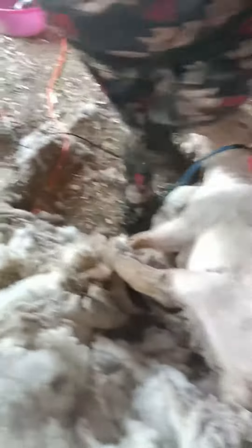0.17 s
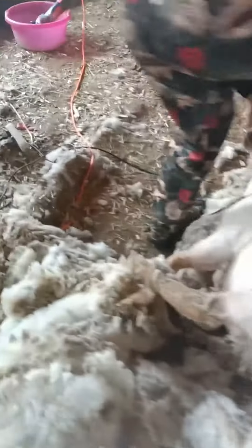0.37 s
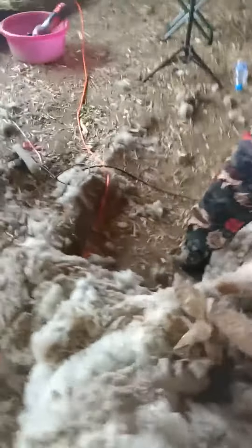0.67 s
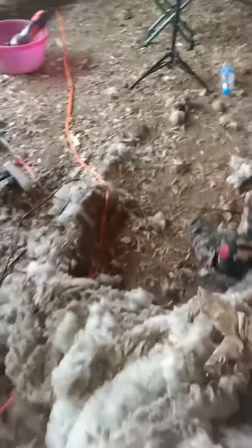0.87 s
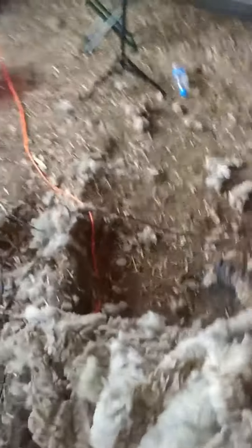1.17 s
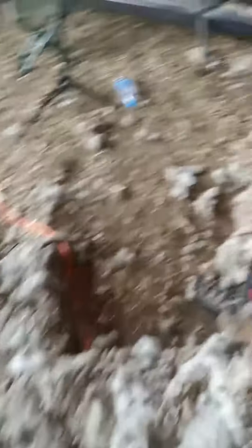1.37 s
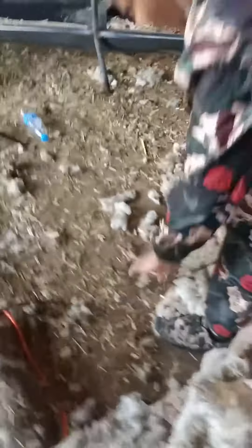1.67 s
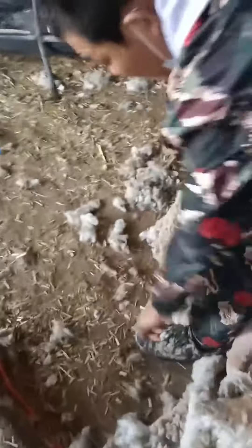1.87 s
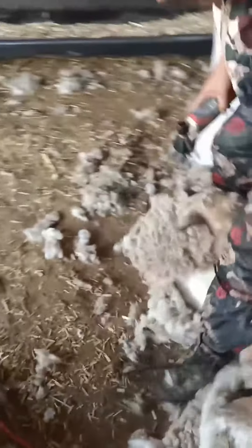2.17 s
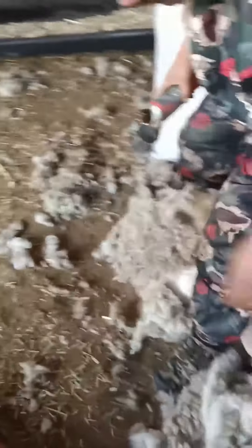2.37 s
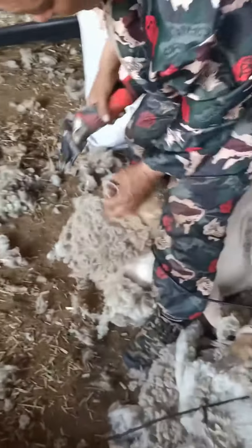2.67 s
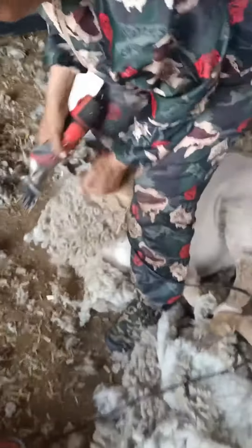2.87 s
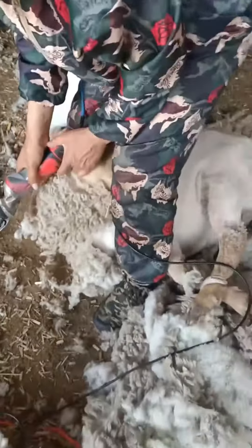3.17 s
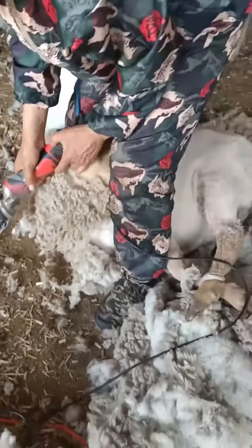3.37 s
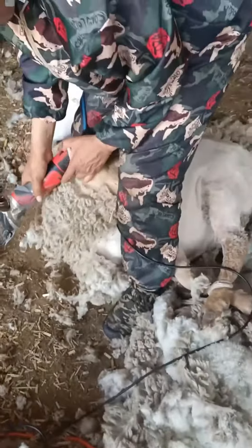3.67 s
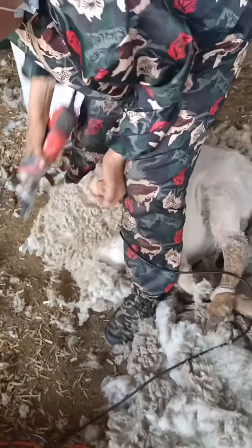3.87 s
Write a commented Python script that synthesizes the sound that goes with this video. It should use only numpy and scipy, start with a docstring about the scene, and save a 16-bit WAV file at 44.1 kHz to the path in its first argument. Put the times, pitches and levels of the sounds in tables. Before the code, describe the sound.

Electric clipper motor coasts down within half a second; about three seconds of faint rustling, small ticks, muffled bumps and low air rumble follow, then the motor whines up, bright and close, on a barn floor, hand-held microphone.

```python
"""A whine and rattle sag to a stop, a rustling lull follows, then the motor whines up again close by.
It is an electric shearing handpiece in an open barn: wavering rotor orders over gear rattle, coloured by its housing
and followed by noise tails for the barn. Fleece and straw rustle as patchy hiss, feet, body and cable bump as dull
rings, straw and metal tick, and low noise stands for air over the two ports of a hand-held microphone."""
import sys
import numpy as np
from scipy import signal
from scipy.fft import rfft, irfft
from scipy.io import wavfile

SR = 44100
rng = np.random.default_rng(int(sys.argv[2]) if len(sys.argv) > 2 else 0)


def store_wav(level_fs):
    """Save 16-bit WAV to argv[1]."""
    pcm = np.round(np.clip(np.atleast_2d(level_fs), -1, 1) * 32767)
    wavfile.write(sys.argv[1], SR, pcm.T.astype(np.int16))


def makeup_ratio(level_db):
    """Linear amplitude ratio for a level in decibels (20 dB per factor of ten)."""
    decades = np.asarray(level_db, float) / 20
    return 10 ** decades


N = 176400
HZ = np.fft.rfftfreq(N + SR, 1 / SR) + 1e-3  # filter bins, with a second of room for tails

# air over the ports, before lumps and brightening: (time [s], level [dB])
WIND = [(0, -38.5), (.43, -48.5), (.6, -45), (.95, -56), (1., -39), (1.3, -42), (1.55, -47), (1.84, -56.5),
        (1.88, -42.5), (2.25, -43.5), (2.72, -59), (3.05, -48), (3.2, -68), (3.31, -59.5), (4, -61)]
# spectrum of that air: (frequency [Hz], relative density [dB])
WIND_COLOUR = [(15, 12), (45, 5.5), (80, 2), (234, -16), (450, -56)]
# single buffets of air on the ports: (time [s], starting level [dB])
BUFFETS = [(.462, -29.5), (1.13, -32.5), (1.258, -34), (1.345, -40), (1.415, -39), (1.863, -41.5),
           (2.211, -37)]
# fleece and straw, before patches and pan: (time [s], level [dB])
RUSTLE = [(.48, -51.5), (.6, -54.5), (.93, -53), (1., -49), (1.16, -57.5), (1.45, -49.5), (1.56, -52),
          (1.7, -50), (1.84, -56), (2.02, -50), (2.08, -54.5), (2.21, -50.5), (2.4, -56.5), (2.66, -51.5),
          (2.72, -59.5), (3.05, -55.5), (3.45, -60), (3.58, -64)]
# spectrum of fleece and straw: (frequency [Hz], relative density [dB])
RUSTLE_COLOUR = [(200, -4), (607, -8.5), (1150, -12), (2500, -8), (4200, -7.5), (5000, -13.5), (7090, -22),
                 (10000, -27), (15500, -23.5)]
# how alike the two ports hear the rustle: (frequency [Hz], left-right correlation [-1 to 1])
RUSTLE_LIKENESS = [(290, 0.91), (900, 0), (15000, 0.09)]
# soft bumps of feet, body and cable, before pan: (time [s], starting level [dB], pitch [Hz])
BUMPS = [(0.279, -33.5, 175), (0.505, -45.5, 220), (0.545, -42, 402), (0.875, -40.5, 240),
         (0.931, -46.5, 288), (1.37, -48.5, 353), (1.457, -40.5, 270), (1.517, -47, 400), (1.747, -40, 277),
         (1.922, -42.5, 266), (2.002, -43.5, 191), (3.009, -45, 200), (3.062, -52.5, 524),
         (3.302, -42.5, 162), (3.362, -52, 584), (3.531, -49, 215)]
# dry ticks of straw and metal: (time [s], starting level [dB], pitch [Hz], treble of the spit over its low part [dB])
TICKS = [(0.394, -40, 5500, 7), (1.01, -41.5, 2780, -22), (1.073, -40, 4080, -9), (1.424, -43, 3420, 0),
         (1.504, -47.5, 3500, 10.5), (2.1919, -34.5, 3040, -78), (2.204, -38.5, 3000, -41)]
# thin sizzles as the blades drag to rest: (time [s], length [s], level [dB], centre [Hz], width [Hz])
SIZZLES = [(0.357, 0.0065, -41, 12700, 2500), (0.379, 0.034, -45.5, 13100, 3970),
           (0.415, 0.063, -51, 10970, 1490)]
# motor loudness, before pan and barn: (time [s], level [dB], treble gain [dB])
COAST_LEVEL = [(0, -28, 0), (.1, -31.5, -2), (.18, -34.5, 0.5), (.27, -36, 0.5), (.33, -43.5, 5),
               (.42, -52, 8), (.5, -69, 10)]
SPIN_LEVEL = [(3.584, -65, -14), (3.593, -35.5, 1.5), (3.62, -27, 2), (3.68, -26.5, 3.5), (3.741, -20, 1),
              (3.85, -19.5, 2), (3.95, -20.5, 6.5), (4, -20.5, 3.5)]
# whining multiples of the rotor speed: (order [per turn])
COAST_ORDERS = [3, 6, 9, 12, 15]
SPIN_ORDERS = [1, 5, 6, 7, 12, 13, 15]
# whine of each order at speed, before waver and colour: (amplitude over rattle rms [dB])
COAST_ORDER_DB = [-9, -5, -6, -9, -12]
SPIN_ORDER_DB = [-11, -13, -8, -11, -9, -12, -9]
# housing as heard from each side: (frequency [Hz], relative gain [dB])
COAST_COLOUR = [(250, -22), (913, -25.5), (1560, -12.5), (1850, -13), (2300, 2), (2730, -4.5), (4320, 0.5),
                (5200, -9), (6520, -22), (8200, -32), (11500, -24.5), (13900, -16.5), (15500, -6)]
SPIN_COLOUR = [(130, -27.5), (280, -20), (560, -10.5), (1190, -10), (1600, -2.5), (2400, -4.5), (3500, 5),
               (4100, 4.5), (5400, -2), (6470, -15.5), (8300, -20), (9100, -42), (9700, -20.5),
               (14500, -13.5)]
# direct sound at the two ports: (frequency [Hz], left leads right by [rad])
COAST_PHASE = [(100, -1), (2500, 1.67), (9000, 6)]
SPIN_PHASE = [(950, .8), (1500, 1.7), (1950, 5.2), (2500, 6.7), (3600, 7.8), (4500, 9.2), (7240, 13.3),
              (10500, 34)]

TREBLE_HZ, BASS_HZ = 7860, 1290  # corners of tilt()
WIND_LUMPY_DB, WIND_LUMP_HZ = 3.5, 14
WIND_GUST_BRIGHTENS = 0.62  # dB above 70 Hz per dB of gust
BUFFET_HZ, BUFFET_T60_S = 55.3, .16
RUSTLE_GRAINS_PER_S, RUSTLE_GRAIN_SHARE = 320, 0.23
RUSTLE_PATCHY_DB, RUSTLE_PAN_DB = 1.5, -1  # pan: left gain, right gets the opposite
RUSTLE_TREBLE_FOLLOWS, RUSTLE_BASS_FOLLOWS = 0.077, -0.36  # dB per dB of swell
BUMP_T60_S, BUMP_PAN_DB = 0.059, -1.5  # pan: left gain, right gets the opposite
BUMP_PUFF_DB, BUMP_PUFF_HZ = -9, 770
TICK_T60_S, TICK_SPIT_T60_S, TICK_SPIT_DB = .009, .035, -10.5
COAST_START_HZ, COAST_SAG_HZ_PER_S = 205, 405
FULL_HZ, SHORT_OF_FULL_HZ, SPIN_FROM_S, SPIN_LAG_S = 430, 298, 3.6, .179
RATTLE_PER_TURN, RATTLE_SPREAD_DB, RATTLE_SHARE = 4.6, 2, 0.43
TURNS_PER_STROKE, STROKE_DB, TURN_DB, KNOCK_DB = 11.5, -1, 0.5, 4.5
WHINE_WAVER_DB, WHINE_WAVER_HZ, TURN_JITTER_RAD = 4.5, 30, .035
COAST_PAN_DB, SPIN_PAN_DB = -1.5, -.3  # left minus right
COAST_WET_DB, SPIN_WET_DB, BARN_T60_S = -6, -5, .3
TOP_HZ = 14600  # upper limit of the motor


def rms_one(x):
    """Scale to rms 1."""
    return x / np.sqrt(np.mean(x ** 2) + 1e-20)


def in_time(rows):
    """Table columns joined by straight lines in time."""
    s, *columns = np.transpose(rows)
    return [np.interp(np.arange(N) / SR, s, c) for c in columns]


def at_hz(points, hz=HZ):
    """Table value on a log-frequency axis."""
    f, v = np.transpose(points)
    return np.interp(np.log(hz), np.log(np.maximum(f, 1e-3)), v)


def shape(x, response):
    """Filter by a frequency response."""
    return irfft(rfft(x, N + SR) * response, N + SR)[..., :N]


def high_pass(hz, order=4):
    """Smooth response that passes what lies above hz."""
    return 1 / (1 + (hz / HZ) ** order)


def low_pass(hz, order=4):
    """Smooth response that passes what lies below hz."""
    return 1 / (1 + (HZ / hz) ** order)


def drift(rate_hz):
    """Slow random wander of spread 1, drawn at a twentieth of the sample rate."""
    r = np.exp(-40 * np.pi * rate_hz / SR)
    slow = signal.lfilter([1], [1, -2 * r, r * r], rng.standard_normal(N // 20 + 3002))
    slow = slow[3000:]  # settled part
    return np.interp(np.arange(N) / 20, np.arange(len(slow)), rms_one(slow))


def grains(per_s, spread_db):
    """Random clicks of uneven size and either sign."""
    sizes = makeup_ratio(spread_db * np.minimum(rng.exponential(1, N), 5)) * rng.choice([-1, 1], N)
    return sizes * (rng.random(N) < per_s / SR)


def tilt(x, treble_db, bass_db):
    """Separate gains for the top and the bottom."""
    top = shape(x, high_pass(TREBLE_HZ, 20))
    low = shape(x, low_pass(BASS_HZ, 10))
    return x + top * (makeup_ratio(treble_db) - 1) + low * (makeup_ratio(bass_db) - 1)


def ring(s, db, hz, t60):
    """One damped sine starting at s."""
    t = np.arange(N) / SR - s
    return (t > 0) * makeup_ratio(db - 60 * np.maximum(t, 0) / t60) * np.sin(2 * np.pi * hz * t)


def wind():
    """Air over the ports: low noise, its own in each, lumpy and brighter in gusts, plus thumping buffets."""
    level_db, = in_time(WIND)
    lumps_db = [WIND_LUMPY_DB * (drift(WIND_LUMP_HZ) - .5) for _ in range(2)]
    gust_db = level_db + np.array(lumps_db)
    air = rms_one(shape(rng.standard_normal((2, N)), makeup_ratio(at_hz(WIND_COLOUR))))
    upper = shape(air, high_pass(70))
    brighten = makeup_ratio(WIND_GUST_BRIGHTENS * (gust_db - gust_db.mean())) - 1
    buffets = sum(ring(s, db, BUFFET_HZ, BUFFET_T60_S) for s, db in BUFFETS)
    return makeup_ratio(gust_db) * (air + upper * brighten) - buffets


def rustle():
    """Fleece and straw: patchy fine hiss with small crackles, partly shared by the two ports."""
    level_db, = in_time(RUSTLE)
    swell_db = level_db - level_db.mean()
    crackle = rms_one(grains(RUSTLE_GRAINS_PER_S, spread_db=9.0))
    mid = (1 - RUSTLE_GRAIN_SHARE) * rng.standard_normal(N) + RUSTLE_GRAIN_SHARE * crackle
    alike = np.clip(at_hz(RUSTLE_LIKENESS), -.99, .99)
    gain = makeup_ratio(at_hz(RUSTLE_COLOUR))
    mid = shape(rms_one(mid), gain * np.sqrt(1 + alike))
    side = shape(rng.standard_normal(N), gain * np.sqrt(1 - alike))
    pair = rms_one(np.array([mid + side, mid - side]))
    bass_db = RUSTLE_PATCHY_DB * drift(2.1) + RUSTLE_BASS_FOLLOWS * swell_db
    pair = tilt(pair, RUSTLE_TREBLE_FOLLOWS * swell_db, bass_db)
    pan_db = np.array([[RUSTLE_PAN_DB], [-RUSTLE_PAN_DB]])
    return pair * makeup_ratio(level_db + RUSTLE_PATCHY_DB * drift(10.7) + pan_db)


def bumps():
    """Feet, body and cable: a dull ring and a puff of low noise for each bump."""
    t = np.arange(N) / SR
    puff = rms_one(shape(rng.standard_normal(N), low_pass(BUMP_PUFF_HZ) * high_pass(200)))
    x = np.zeros(N)
    for s, db, hz in BUMPS:
        # the puff dies away at half the ring's rate
        decay = makeup_ratio(db + BUMP_PUFF_DB - 30 * np.abs(t - s) / BUMP_T60_S)
        x += ring(s, db, hz, BUMP_T60_S) + puff * (t > s) * decay
    return x * makeup_ratio([[BUMP_PAN_DB], [-BUMP_PAN_DB]])


def ticks():
    """Straw and metal: a very short ring and a spit of noise with its own treble."""
    t = np.arange(N) / SR
    white = rng.standard_normal((2, N))
    low = rms_one(shape(white[0] + .5 * white, makeup_ratio(at_hz(RUSTLE_COLOUR)) * high_pass(1500)))
    top = rms_one(shape(white, high_pass(TREBLE_HZ, 10)))
    x = np.zeros((2, N))
    for s, db, hz, top_db in TICKS:
        decay = makeup_ratio(db + TICK_SPIT_DB - 60 * np.abs(t - s) / TICK_SPIT_T60_S)
        spit = (low + top * makeup_ratio(top_db)) * (t > s - .001) * decay  # starts 1 ms early
        x += ring(s, db, hz, TICK_T60_S) + spit
    return x


def sizzles():
    """Blades dragging to rest: brief narrow bands of hiss that fade over their second half."""
    t = np.arange(N) / SR
    white = rng.standard_normal((2, N))
    x = np.zeros((2, N))
    for s, length, db, hz, width in SIZZLES:
        fade = np.clip(np.minimum((t - s) / .002, (s + length - t) / length * 2), 0, 1)
        x += makeup_ratio(db) * fade * rms_one(shape(white, 1 / (1 + (2 * (HZ - hz) / width) ** 4)))
    return x


def gear_rattle(turns_hz, angle, stroke):
    """Clicks paced by the rotor plus noise, beating with each turn; the bass knocks with each blade stroke."""
    clicks = rms_one(grains(RATTLE_PER_TURN * turns_hz, RATTLE_SPREAD_DB))
    noise = rng.standard_normal(N) + rng.standard_normal((2, N))  # shared part plus one for each port
    rattle = RATTLE_SHARE * clicks + (1 - RATTLE_SHARE) * noise
    rattle = rms_one(rattle * makeup_ratio(TURN_DB * np.cos(angle)))
    return tilt(rattle, 0, KNOCK_DB * np.cos(stroke))


def rotor_whine(turns_hz, angle, stroke, orders, order_db):
    """Sines at multiples of the rotor angle, wavering in level and phase, that emerge with speed."""
    uneven = angle + TURN_JITTER_RAD * (drift(2 * WHINE_WAVER_HZ) + np.sin(stroke))
    whine = np.zeros(N)
    for k, db in zip(orders, order_db):
        level = makeup_ratio(db + WHINE_WAVER_DB * drift(WHINE_WAVER_HZ))
        whine += level * np.sin(k * uneven + drift(WHINE_WAVER_HZ))
    return whine * np.minimum(2 * turns_hz / turns_hz.max(), 1) ** 2  # full from half the top speed


def barn_and_ports(body, lead, pan_db, wet_db):
    """Direct sound with a phase lead between the ports, plus a decaying noise tail for each port."""
    t = np.arange(SR // 2) / SR
    tails = rng.standard_normal((2, len(t))) * makeup_ratio(-60 * t / BARN_T60_S) * (t > .004)
    tails = rfft(tails / np.sqrt((tails ** 2).sum(1, keepdims=True)), N + SR)
    side = np.array([[.5], [-.5]])
    direct = np.exp(1j * side * at_hz(lead))
    return shape(body, makeup_ratio(side * pan_db) * (direct + makeup_ratio(wet_db) * tails))


def motor(turns_hz, level, orders, order_db, colour, lead, pan_db, wet_db):
    """The handpiece: rattle and whine pulse with the blade stroke, through housing, barn and ports."""
    level_db, treble_db = in_time(level)
    angle = 2 * np.pi * np.cumsum(turns_hz) / SR
    stroke = angle / TURNS_PER_STROKE
    rattle = gear_rattle(turns_hz, angle, stroke)
    whine = rotor_whine(turns_hz, angle, stroke, orders, order_db)
    pulsing = (rattle + whine) * makeup_ratio(STROKE_DB * np.cos(stroke))
    body = shape(pulsing, makeup_ratio(at_hz(colour)) * low_pass(TOP_HZ, 40))
    # rms 1, counting the loud stretches most
    body = body / np.sqrt(np.average((body ** 2).mean(0), weights=makeup_ratio(level_db)))
    body = tilt(body, treble_db, 0) * makeup_ratio(level_db)
    return barn_and_ports(body, lead, pan_db, wet_db)


def coast():
    """Rotor speed falls in a straight line to a 20 Hz floor while the level table fades it."""
    t = np.arange(N) / SR
    turns_hz = np.maximum(COAST_START_HZ - COAST_SAG_HZ_PER_S * t, 20)
    return motor(turns_hz, COAST_LEVEL, COAST_ORDERS, COAST_ORDER_DB,
                 COAST_COLOUR, COAST_PHASE, COAST_PAN_DB, COAST_WET_DB)


def spin_up():
    """Rotor speed climbs exponentially towards full speed after switching on."""
    t = np.arange(N) / SR
    turns_hz = np.maximum(FULL_HZ - SHORT_OF_FULL_HZ * np.exp((SPIN_FROM_S - t) / SPIN_LAG_S), 20)
    return motor(turns_hz, SPIN_LEVEL, SPIN_ORDERS, SPIN_ORDER_DB,
                 SPIN_COLOUR, SPIN_PHASE, SPIN_PAN_DB, SPIN_WET_DB)


def scene():
    """All sources at the hand-held microphone, background first."""
    background = wind() + rustle()
    handling = bumps() + ticks() + sizzles()
    return background + handling + coast() + spin_up()


def band_limit(x):
    """A steep low-pass at the top of the band."""
    return signal.sosfilt(signal.butter(12, 15760, fs=SR, output="sos"), x)


def record(dry):
    """The finished stereo mix as it is delivered."""
    return band_limit(dry)


dry = scene()
out = record(dry)
store_wav(out)
```